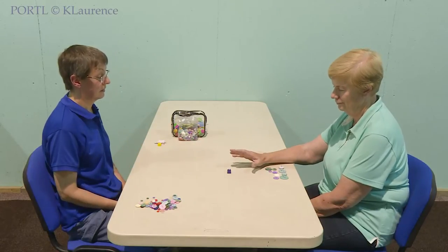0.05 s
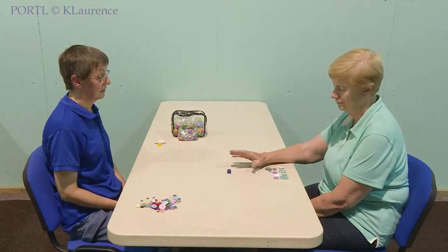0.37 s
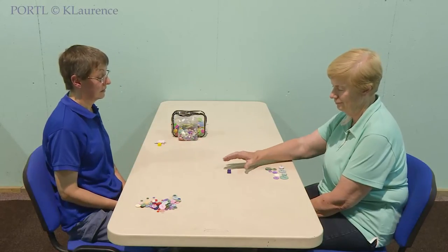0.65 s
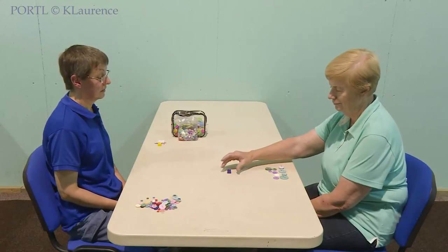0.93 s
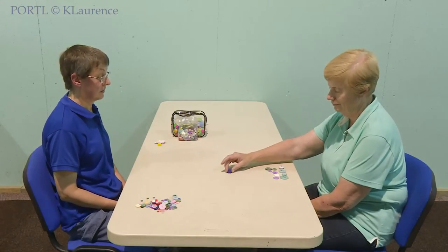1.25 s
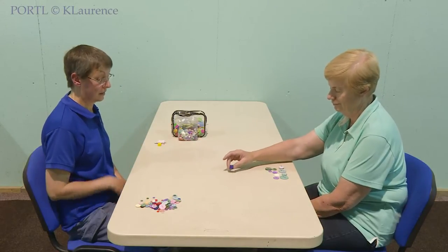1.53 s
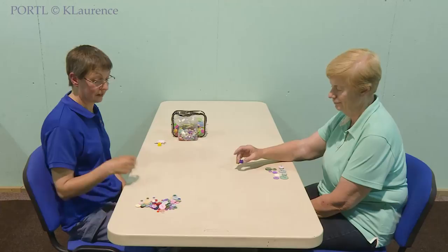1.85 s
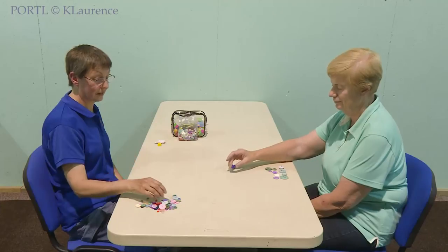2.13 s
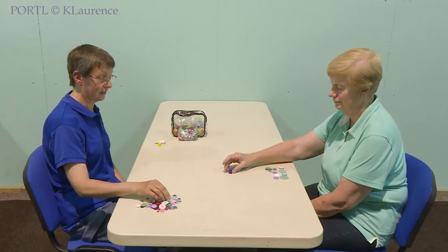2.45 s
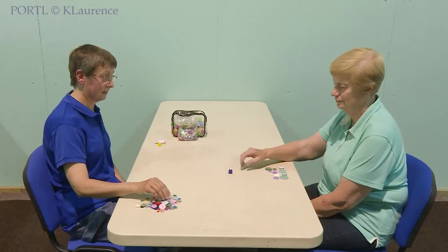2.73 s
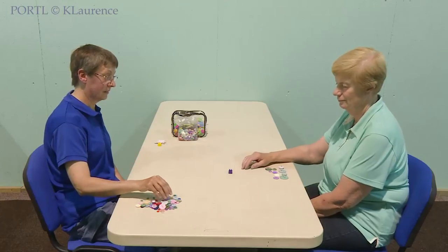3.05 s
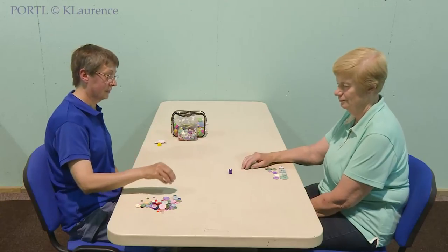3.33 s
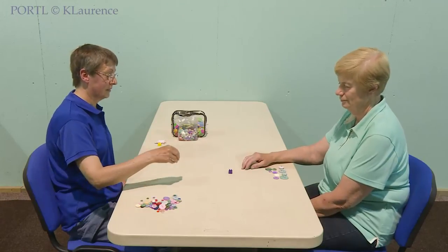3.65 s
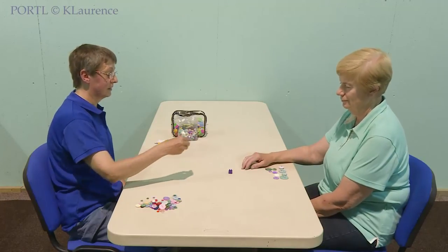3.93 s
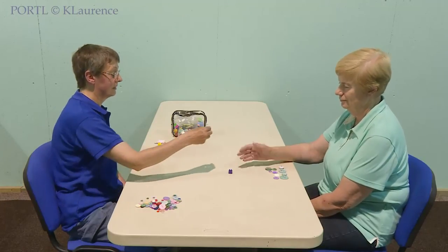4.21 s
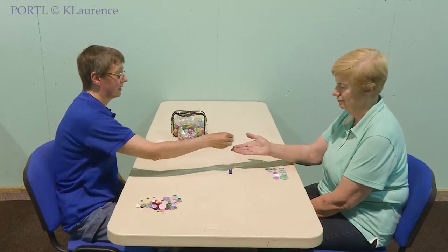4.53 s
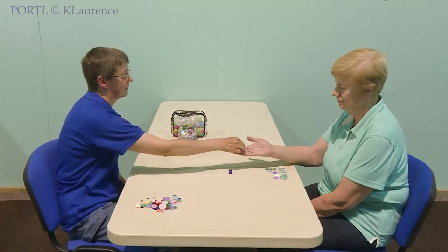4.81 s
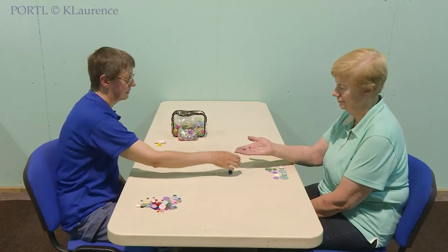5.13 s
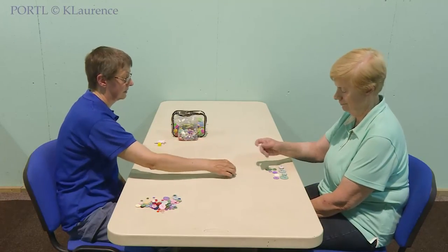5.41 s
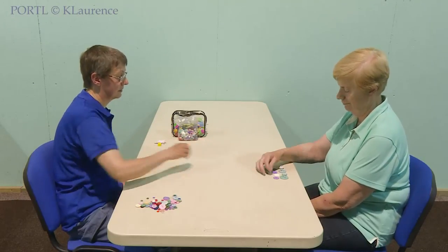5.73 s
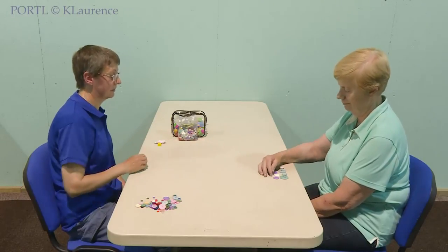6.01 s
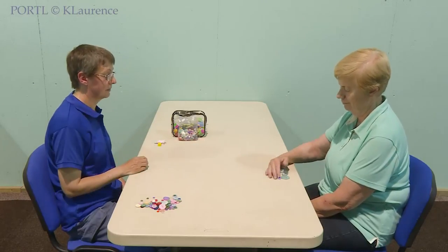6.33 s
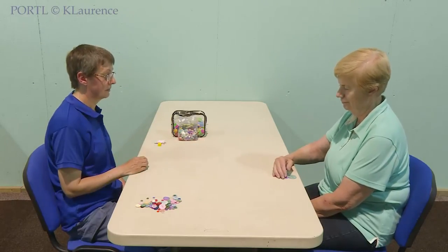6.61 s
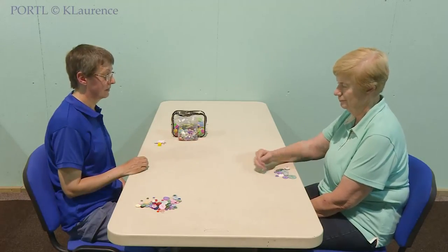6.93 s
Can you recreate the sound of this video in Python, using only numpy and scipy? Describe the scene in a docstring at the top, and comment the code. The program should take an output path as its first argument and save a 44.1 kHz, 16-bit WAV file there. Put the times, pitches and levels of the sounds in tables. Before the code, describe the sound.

In a bare room, a clicker gives a sharp double click, followed by light clacks of plastic buttons being handled on a table.

```python
"""A metal training clicker is pressed and released at a plastic table in a bare, echoing room.
Its steel tongue buckles in and back, ringing with the case. A second person picks a plastic button
from a pile, which clatters and knocks the tabletop; later buttons are set down and slid.
Sleeves brush, hands land, two faint squeaks pass. Under it: ventilation, mains hum, a low rumble."""
import sys
import numpy as np
from scipy import signal
from scipy.fft import rfft, irfft, next_fast_len
from scipy.io import wavfile
from scipy.ndimage import uniform_filter1d

SR = 44100
rng = np.random.default_rng(int(sys.argv[2]) if len(sys.argv) > 2 else 0)


def put_to_file(sound):
    """Save the sound as 16-bit audio at rate SR, in the file named by the first command-line argument."""
    columns = np.atleast_2d(sound).T  # one column per channel
    safe = np.clip(columns, -1, 1)
    whole_steps = np.round(safe * 32767)
    wavfile.write(sys.argv[1], SR, whole_steps.astype(np.int16))


N = 311346
TIME = np.arange(N) / SR

# Button modes: whole-body flex, clack, edge tick. Each row: frequency in Hz, level in dB, t60 in seconds.
FLEX_MODES = [(2160, -8.5, 0.0035), (2593, -1.5, 0.0036), (2879, 0.5, 0.0035)]
CLACK_MODES = [(3690, -9, 0.004), (4540, 2, 0.0032), (5170, 2, 0.0023), (5930, 0, 0.0033),
               (6760, -9, 0.0016)]
EDGE_MODES = [(7800, -0.5, .002), (9300, 0.5, 0.0023), (10670, 2, 0.0014), (12300, -2.5, 0.0018),
              (14110, -3.5, 0.0017)]


def clicker():
    """The steel tongue snaps in, then back. Returns the direct sound and the room feed."""
    # Tongue and case modes, bent and relaxed.
    # Each row: frequency in Hz, level in dB, t60 in seconds, extra room feed in dB.
    bent_modes = [(1420, -33, 0.0077, 11), (1685, -29.5, 0.0056, 10.5), (2832, -18.5, 0.003, -1),
                  (4345, -11.5, 0.011, 3), (4763, 0, 0.0067, 1.5), (5830, -18, 0.0052, 6),
                  (6830, -24, .004, 6.5), (8600, -7, .0017, 2), (9360, -19, 0.0036, 5.5),
                  (12700, -13.5, .0016, 0)]
    relaxed_modes = [(1350, -22.5, 0.003, 0.5), (1696, -16, 0.0031, 9.5), (2270, -13.5, 0.0088, 0.5),
                     (2554, -6.5, 0.0066, -1), (3720, -15.5, 0.015, 4), (4400, -6.5, 0.0031, 2),
                     (4750, 0, 0.0034, 2.5), (5530, -22, 0.0069, 12), (9500, -4, 0.0034, 5),
                     (11200, -14, 0.0017, 6)]
    press = snap(bent_modes, start_s=1.2689, level_db=-11.5, crack_db=-20.5, crack_t60_s=.031)
    release = snap(relaxed_modes, start_s=1.4191, level_db=-19, crack_db=-21, crack_t60_s=.02)
    return press + release


def snap(modes, start_s, level_db, crack_db, crack_t60_s):
    """The tongue buckles and rings; the case recoils in opposite phase."""
    case_top_hz = 3250   # lower modes belong to the case
    direct, room_feed = np.zeros(N), np.zeros(N)
    rasp = from_db(level_db + crack_db) * crack(crack_t60_s)
    add(direct, start_s, rasp)
    add(room_feed, start_s, rasp)
    for hz, mode_db, t60_s, room_db in modes:
        tone = np.sign(hz - case_top_hz) * from_db(level_db + mode_db) * bloom(hz, t60_s)
        add(direct, start_s, tone)
        add(room_feed, start_s, from_db(room_db) * tone)
    radiation = signal.butter(3, 900, "high", fs=SR, output="sos")   # a small plate radiates little bass
    return signal.sosfilt(radiation, np.array([direct, room_feed]) + 1e-18)


def crack(t60_s):
    """Brief broadband rasp of a hard contact."""
    t = TIME[:SR // 4]
    return np.diff(rng.standard_normal(len(t) + 1)) / 2 * decay(t, t60_s)


def bloom(hz, t60_s):
    """A tongue mode drives the case at the same pitch: it swells to height 1, then dies."""
    age = np.log(1000) * TIME[:SR // 4] / t60_s
    return np.e * age * ring(hz, t60_s)


def buttons():
    """Each touch knocks the tabletop and rings the button."""
    # Each row: start in seconds, clack in dB, brightness in dB, table knock in dB.
    touches = [(1.094, -59.5, 9.5, -69.5), (2.4133, -53, 2.5, -85), (2.5094, -66.5, 2, -82),
               (2.5708, -66.5, -6.5, -83), (2.663, -58.5, -5, -80), (2.686, -64.5, 3, -82),
               (2.828, -68.5, 9, -78.5), (2.885, -56, 0, -62), (2.8939, -35, 2, -51.5),
               (2.9007, -55, -11, -53), (2.9306, -43.5, 2.5, -60.5), (2.9608, -33, 3, -43),
               (2.971, -56, 14, -61), (3.0323, -58.5, 18, -56), (3.0412, -40.5, 7.5, -55.5),
               (3.0801, -51.5, 7, -56.5), (5.8543, -54, -7.5, -58), (6.0984, -43, 6.5, -51.5),
               (6.1322, -47, 5, -61.5), (6.2542, -58, -14, -59.5), (6.4076, -51, -0.5, -57.5),
               (6.5634, -58, -8, -58.5), (6.5778, -50.5, -6, -58), (6.6078, -51.5, 1, -53.5),
               (6.6956, -54, -10, -70), (6.7262, -52, 3.5, -47.5)]
    # Each row: frequency in Hz, level in dB, t60 in seconds.
    tabletop_modes = [(246.6, -11, 0.023), (460, -8, 0.02), (693.3, -1, .013), (889, 0, 0.0095),
                      (1120, 0, 0.014), (1550, -0.5, 0.0049)]
    out = np.zeros(N)
    for start_s, clack_db, bright_db, knock_db in touches:
        # Flex follows the knock; a bright, edge-on touch ticks more and flexes less.
        flex_db = knock_db - .5 - .4 * bright_db
        tick_db = clack_db - 7.5 + bright_db
        add(out, start_s, from_db(knock_db) * strike(tabletop_modes, chatter=.9, chatter_t60_s=.04))
        add(out, start_s, from_db(flex_db) * strike(FLEX_MODES, chatter=.7, chatter_t60_s=.04))
        add(out, start_s, from_db(clack_db) * strike(CLACK_MODES, chatter=.8, chatter_t60_s=.0254))
        add(out, start_s, from_db(tick_db) * strike(EDGE_MODES, chatter=.9, chatter_t60_s=.025))
    return out


def strike(modes, chatter, chatter_t60_s):
    """One blow, then rough chatter; mode levels and pitches vary. Energy of 5 ms at rms 1."""
    rings = 0
    for k, (hz, db, t60_s) in enumerate(modes):
        gain = from_db(db + rng.normal(0, 2.1))
        detune = np.exp(rng.normal(0, .035))
        rings = rings + (-1) ** k * gain * ring(hz * detune, t60_s)
    t = TIME[:SR // 25]
    force = rng.standard_normal(len(t)) * decay(t, chatter_t60_s)
    force *= chatter / np.linalg.norm(force)
    force[0] += 1   # the blow
    radiation = signal.butter(2, .94 * modes[0][0], "high", fs=SR, output="sos")
    sound = signal.sosfilt(radiation, signal.fftconvolve(rings, force))
    return sound * np.sqrt(.005 * SR) / np.linalg.norm(sound)


def scrapes(slips_per_s, uneven_db):
    """Pushed buttons catch and slip; each tiny slip rings their modes."""
    # Each row: start in seconds, length in seconds, level in dB.
    pushes = [(2.41, 0.036, -66.5), (2.65, 0.027, -81), (2.95, 0.15, -57), (6.09, 0.033, -56),
              (6.39, 0.17, -70), (6.55, 0.082, -60.5)]
    slips = (rng.random(N) < slips_per_s / SR) * from_db(uneven_db * rng.standard_normal(N))
    slips *= rng.choice([-1, 1], N)
    body = sum(from_db(db) * strike(modes, chatter=.36, chatter_t60_s=.0083)
               for modes, db in ((FLEX_MODES, -4), (CLACK_MODES, 0), (EDGE_MODES, -6)))
    grit = signal.fftconvolve(slips, body)[:N]
    return strokes(pushes, attack_s=.0063, release_s=.023) * grit / grit.std()


def handling():
    """Arms and buttons slide on the tabletop, sleeves brush, hands land softly."""
    # Each row: start in seconds, length in seconds, level in dB.
    slides = [(0.01, 0.26, -74.5), (2.25, 0.14, -61), (2.85, 0.34, -69.5), (6.16, 0.26, -70),
              (6.37, 0.54, -65.5)]
    brushes = [(3.57, 0.043, -76), (4.21, .07, -75)]
    # Friction spectra. Each row: frequency in Hz, relative density in dB.
    slide_colour = [(150, -5.5), (400, -4.5), (800, -5), (1300, 1.5), (1700, -6), (2200, -23.5),
                    (4000, -22), (8000, -28.5), (15000, -30.5)]
    brush_colour = [(1000, -12), (3000, -8), (5500, 2), (8000, -6), (15000, -7)]
    # Each row: start in seconds, level in dB, frequency in Hz, t60 in seconds.
    hand_thuds = [(2.452, -47, 85, .05), (6.224, -48, 95, .05)]
    out = strokes(slides, attack_s=.025, release_s=.12) * noise(slide_colour)
    out += strokes(brushes, attack_s=.026, release_s=.04) * noise(brush_colour)
    for start_s, db, hz, t60_s in hand_thuds:
        add(out, start_s, from_db(db) * ring(hz, t60_s))
    return out


def squeaks(fall_s, octave_db):
    """A thin, wavering tone and its octave swell, glide down and fade."""
    # Each row: start in seconds, length in seconds, first and last pitch in Hz, level in dB.
    glides = [(4.849, 0.12, 4450, 3870, -75.5), (5.225, 0.04, 4530, 3900, -73.5)]
    out = np.zeros(N)
    waver = 1 + .014 * noise([(30, 0), (60, -3.5), (200, -17), (1000, -55)])
    for start_s, length_s, first_hz, last_hz, db in glides:
        fall = arch(np.minimum((TIME - start_s) / fall_s, 1) / 2)
        pitch_hz = (first_hz + (last_hz - first_hz) * fall) * waver
        phase = 2 * np.pi * np.cumsum(pitch_hz) / SR
        tone = np.sin(phase) + from_db(octave_db) * np.sin(2 * phase)
        out += strokes([(start_s, length_s, db)], attack_s=.054, release_s=.049) * tone
    return out


def reflections(x):
    """Direct sound plus first echoes off table and walls."""
    # Each row: delay in seconds, level in dB.
    echoes = [(.0021, -20), (.0068, -15), (.0095, -17.5), (0.024, -16)]
    out = x.copy()
    for delay_s, db in echoes:
        add(out, delay_s, from_db(db) * x)
    return out


def room(x, scatter_t60_s, build_s):
    """Quick scatter off nearby things, then a tail that builds up and dies sooner in the treble."""
    # Each row: frequency in Hz, early scatter in dB, late tail in dB, tail t60 in seconds.
    diffuse_field = [(198.8, 0, 4, 0.99), (1495, -3, 1, 1.83), (2720, -4.5, -3, 1.4),
                     (4620, -8.5, -8, 1.05), (7050, -10, -13, 0.824), (10000, -13.5, -16.5, 0.6),
                     (15000, -8.5, -22.5, .42)]
    t = TIME[:SR * 3 // 2]
    hz = np.arange(len(t) // 2 + 1) * SR / len(t)
    white, response = rfft(rng.standard_normal(len(t))), 0
    edges_hz = np.geomspace(40, SR / 2, 28)
    for low, high in zip(edges_hz, edges_hz[1:]):
        early_db, late_db, t60_s = (at_hz(diffuse_field, np.sqrt(low * high), k) for k in (1, 2, 3))
        early = decay(t, scatter_t60_s) * (t > .002)
        late = decay(t, t60_s) * (1 - np.exp(-t / build_s))
        early *= from_db(early_db) / np.linalg.norm(early)
        late *= from_db(late_db) / np.linalg.norm(late)
        band = irfft(white * ((hz >= low) & (hz < high)), len(t))
        response = response + np.hypot(early, late) * band
    return signal.fftconvolve(x, response)[:N]


def rumble(floor_db):
    """Low noise that swells now and then and sinks back to its floor."""
    # Each row: middle in seconds, length in seconds, level in dB.
    swells = [(.19, 0.73, -58), (.64, 0.21, -58), (1.32, 0.27, -54), (1.487, 0.22, -59),
              (1.89, 0.44, -58.5), (2.534, 0.64, -55), (3.156, 0.35, -56.5), (3.664, .28, -58),
              (4.332, 0.47, -66.5), (4.97, .3, -70), (5.57, 0.22, -63), (6.985, 0.13, -60)]
    # Each row: frequency in Hz, relative density in dB.
    rumble_colour = [(20, -6), (40, -0.5), (70, -1.5), (110, -5.5), (160, -11.5), (300, -26.5), (600, -50)]
    swell_power = sum((from_db(db) * arch((TIME - middle_s) / length_s + .5)) ** 2
                      for middle_s, length_s, db in swells)
    low = noise(rumble_colour)
    low /= np.sqrt(uniform_filter1d(low ** 2, SR // 8))   # steady the level
    return np.sqrt(from_db(floor_db) ** 2 + swell_power) * low


def mains_hum():
    """Faint steady tones at random phases."""
    # Each row: frequency in Hz, rms level in dB.
    tones = [(199.2, -76), (301.5, -78.5), (602.9, -77), (1981, -85.5), (4947, -91.5), (8904, -96)]
    return sum(from_db(db) * np.sqrt(2) * np.sin(2 * np.pi * (hz * TIME + rng.random()))
               for hz, db in tones)


def ventilation(level_db):
    """Steady rush of air."""
    # Each row: frequency in Hz, relative density in dB.
    air_colour = [(59, -34.5), (100, -10.5), (132, -14.5), (206, -6.5), (266, -10), (302, -5.5), (524, -7),
                  (608, -7.5), (784, -10.5), (1360, -8), (2470, -26.5), (3940, -26.5), (7140, -27.5),
                  (11900, -28.5), (16000, -32)]
    return from_db(level_db) * noise(air_colour)


def from_db(db):
    """Decibels to gain."""
    return 10 ** (np.asarray(db) / 20)


def at_hz(rows, hz, column=1):
    """One column of a spectrum, read on a log-frequency axis."""
    rows = np.array(rows)
    return np.interp(np.log(np.maximum(hz, 1)), np.log(rows[:, 0]), rows[:, column])


def noise(colour):
    """Noise of rms 1, shaped by (Hz, dB) points."""
    size = next_fast_len(N)
    hz = np.arange(size // 2 + 1) * SR / size
    x = irfft(rfft(rng.standard_normal(size)) * from_db(at_hz(colour, hz)), size)[:N]
    return x / x.std()


def decay(t, t60_s):
    """Exponential fall, 60 dB per t60_s."""
    return np.exp(-np.log(1000) * t / t60_s)


def ring(hz, t60_s):
    """A struck mode: a unit sine dying away."""
    t = TIME[:SR // 4]
    return np.sin(2 * np.pi * hz * t) * decay(t, t60_s)


def strokes(rows, attack_s, release_s):
    """Gain of a series of movements: each sets in, lasts its length and dies away."""
    power = 0
    for start_s, length_s, db in rows:
        age_s = TIME - start_s
        attack = np.clip(age_s / attack_s, 0, 1)
        release = np.exp(-np.clip((age_s - length_s) / release_s, 0, 20))
        power = power + (from_db(db) * attack * release) ** 2
    return np.sqrt(power)


def arch(share):
    """Smooth rise and fall as share goes from 0 to 1."""
    return np.sin(np.pi * np.clip(share, 0, 1)) ** 2


def add(track, start_s, sound):
    """Mix a sound into a track."""
    start = int(round(start_s * SR))
    track[start:start + len(sound)] += sound[:N - start]


def scene():
    """Clicker and table sounds in the room, over the background; mono."""
    click, click_feed = clicker()
    table = buttons() + scrapes(slips_per_s=350, uneven_db=5.5) + handling()
    table += squeaks(fall_s=.092, octave_db=-7)
    reverb = room(click_feed + from_db(.5) * table, scatter_t60_s=.06005, build_s=.01)
    background = rumble(floor_db=-67.5) + mains_hum() + ventilation(level_db=-64.5)
    return (reflections(click + table) + reverb + background)[None]


def record(dry):
    """The recorder drops the deepest bass and cuts the top."""
    low_hz, high_hz = 20, 15850
    dry = signal.sosfilt(signal.butter(2, low_hz, "high", fs=SR, output="sos"), dry)
    return signal.sosfilt(signal.ellip(10, .1, 80, high_hz, fs=SR, output="sos"), dry)


dry = scene()
out = record(dry)
put_to_file(out)
```